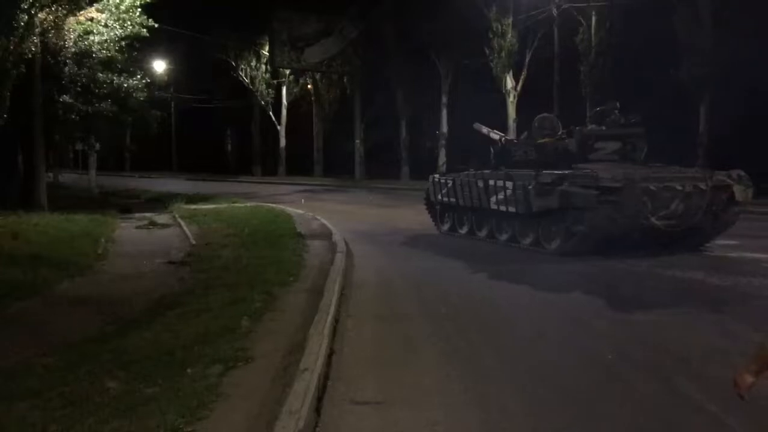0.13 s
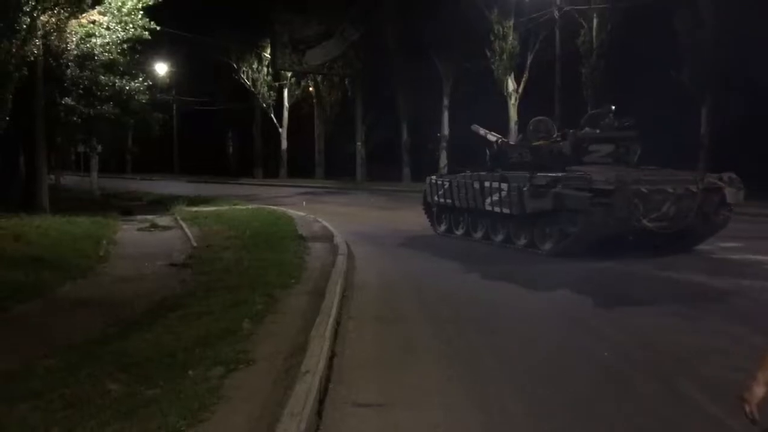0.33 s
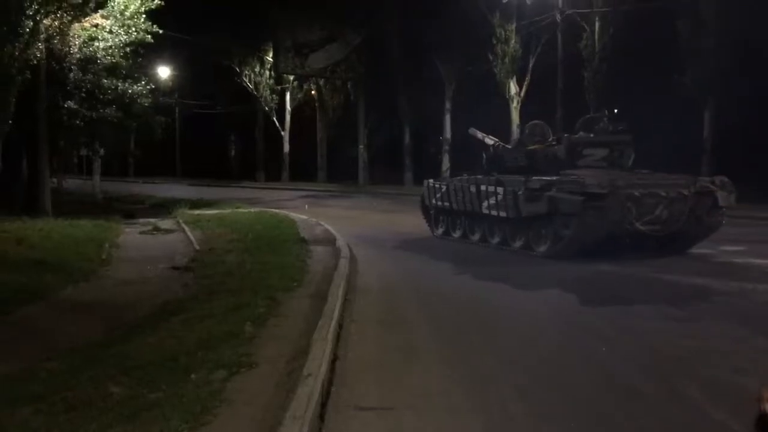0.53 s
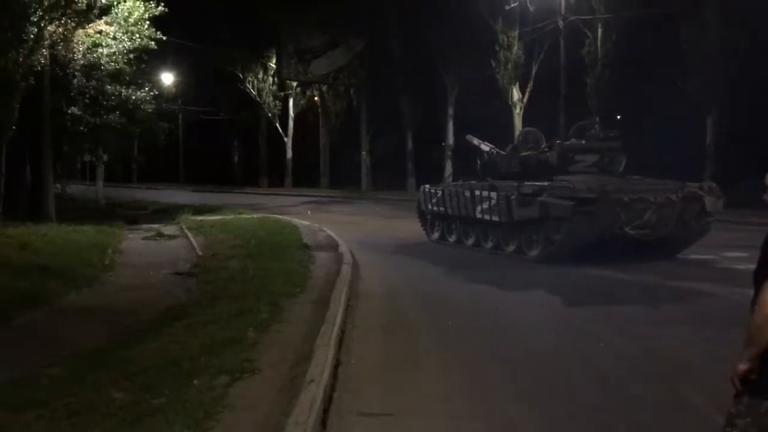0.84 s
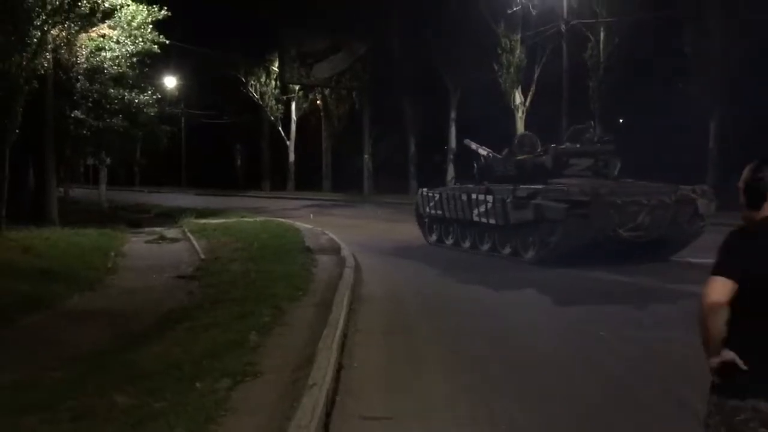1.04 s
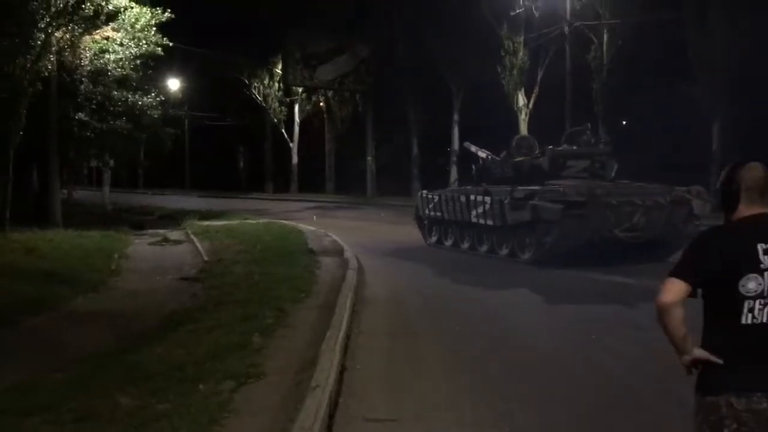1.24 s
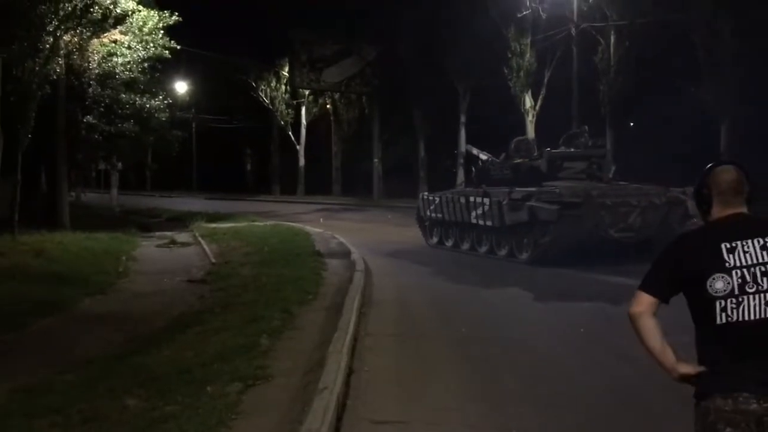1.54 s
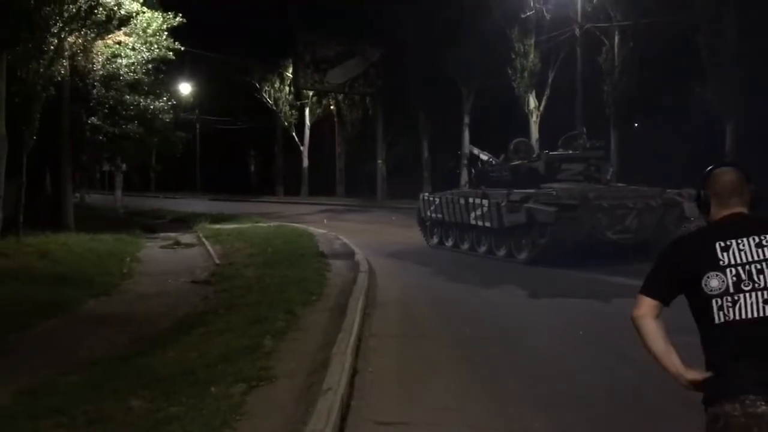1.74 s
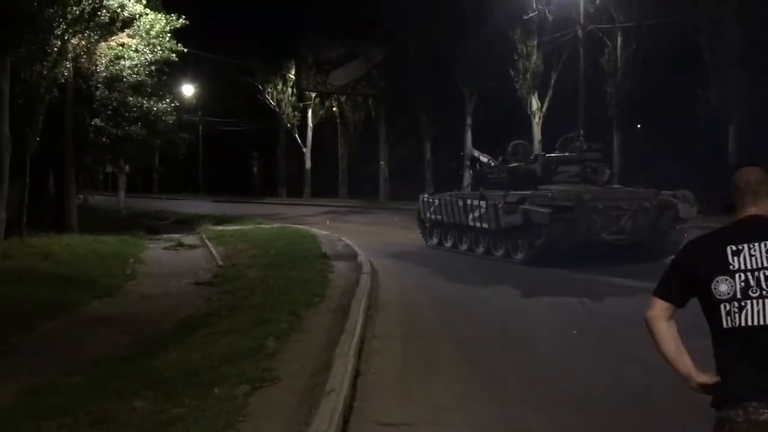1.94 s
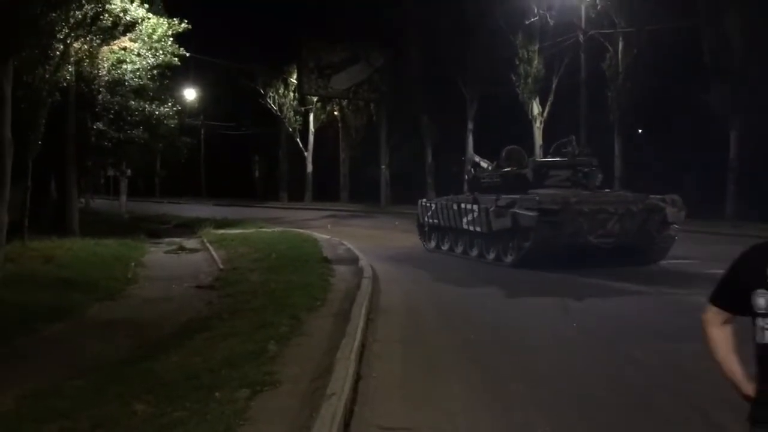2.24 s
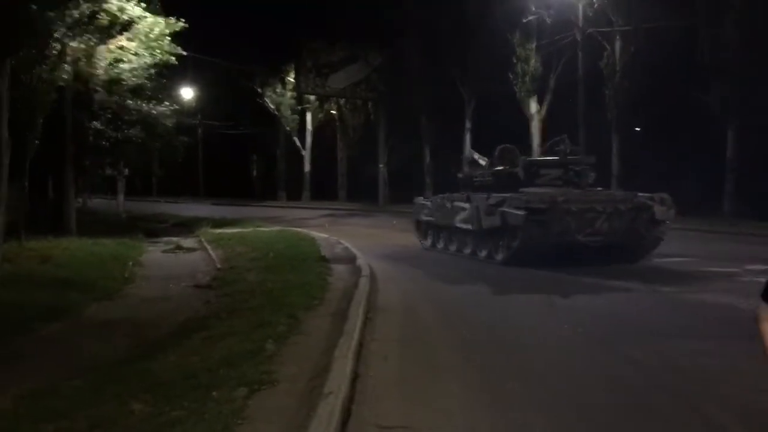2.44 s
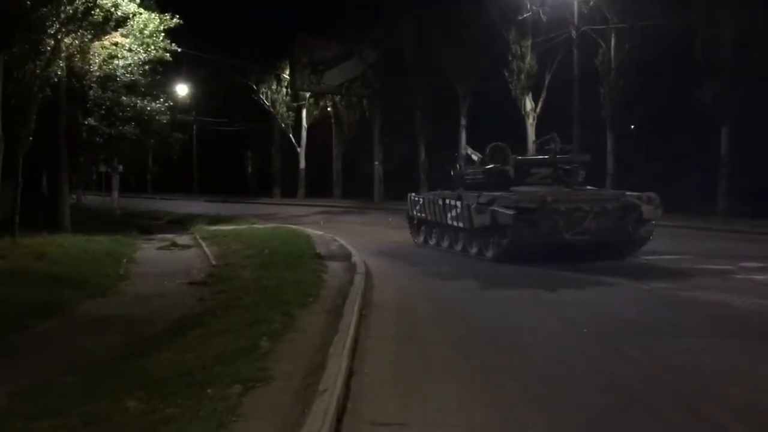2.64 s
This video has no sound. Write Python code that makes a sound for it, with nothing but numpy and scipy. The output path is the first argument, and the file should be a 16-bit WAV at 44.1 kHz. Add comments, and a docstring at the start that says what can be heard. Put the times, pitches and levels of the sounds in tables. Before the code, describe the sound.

After a tiny silence the sound cuts in abruptly: a deep, throbbing tank engine, steady but uneven, over quiet track rattle. Squeaks and ticks thicken in the second half; outdoors, fixed microphone at moderate distance, dull top end.

```python
"""The twelve-cylinder diesel of a heavy tracked vehicle creeping along a road drones unevenly.
The drone is a sum of harmonics of the engine cycle; exhaust and fan roar is shaped noise that throbs with it.
The steel track grinds as shaped noise and rattles as resonators struck by dense knocks.
Single links tick as bright noise bursts, link pins squeak and a brief groan falls as gliding rough tones.
The sound switches on abruptly after a short silence."""
import sys
import numpy as np
from scipy import signal
from scipy.fft import rfft, irfft
from scipy.io import wavfile
from scipy.ndimage import uniform_filter1d

SR = 44100
rng = np.random.default_rng(int(sys.argv[2]) if len(sys.argv) > 2 else 0)


def to_linear_factor(level_db):
    """Convert decibel levels (scalar or array-like) to linear amplitude factors."""
    exponent = np.asarray(level_db, float) / 20
    return 10 ** exponent


def bounce(signal):
    """Save signal as a 16-bit WAV file at the path given by the first command-line argument."""
    frames = np.transpose(np.atleast_2d(signal))
    limited = np.clip(frames, -1, 1)
    pcm = np.round(limited * 32767).astype(np.int16)
    wavfile.write(sys.argv[1], SR, pcm)


N = 123039  # samples
CYLINDERS = 12  # firings per engine cycle

# Course of the firing tone. Each row: time in seconds, firing rate in Hz, mean level in dB rms.
FIRING = [(0.1, 117.5, -34.5), (0.3, 116.3, -39.5), (0.5, 115.6, -36), (0.7, 115.7, -32.5),
          (0.9, 115.8, -30), (1.1, 116, -30.5), (1.3, 116.2, -32), (1.5, 117.3, -34), (1.65, 117, -34),
          (1.8, 114.8, -34), (1.95, 113, -28.5), (2.1, 109.5, -31), (2.25, 109.3, -36.5),
          (2.4, 111.8, -34.5), (2.55, 112.5, -32), (2.75, 115.8, -32.5)]


def level(x, db):
    """Amplitude normalisation: scales a signal to an rms level in dB."""
    return x * to_linear_factor(db) / np.sqrt(np.mean(x ** 2))


def curve(table, column=1):
    """Linear interpolation in time between the rows of a table."""
    rows = np.array(table, float)
    return np.interp(np.arange(N) / SR, rows[:, 0], rows[:, column])


def walk(rate_hz):
    """Slow random modulation: values held for 1 / rate and smoothed twice, with a spread near 1."""
    hold = int(SR / rate_hz)
    held = rng.standard_normal(400)[np.arange(N) // hold]
    smooth = uniform_filter1d(uniform_filter1d(held, hold), hold)
    return 1.3 * smooth  # makes up for the spread lost in smoothing


def flickering_noise(colour):
    """Spectral shaping of white noise, with independent level modulation of overlapping half-octave bands."""
    flicker_db, flicker_hz = 0.92, 12.04
    hz = np.maximum(np.arange(N // 2 + 1) * SR / N, 1)
    rows = np.array(colour, float)
    density_db = np.interp(np.log(hz), np.log(rows[:, 0]), rows[:, 1], -90, -90)
    shaped = rfft(rng.standard_normal(N)) * to_linear_factor(density_db)
    place = 2 * np.log2(hz / 10)  # half octaves above 10 Hz
    out = 0
    for band in range(22):
        weight = np.clip(1 - abs(place - band), 0, 1)
        out = out + irfft(shaped * weight, N) * to_linear_factor(flicker_db * walk(flicker_hz))
    return out


def knocks():
    """Random impact train: the envelope of dense uneven knocks with exponential tails, rms 1."""
    rate_per_s, spread_db, tail_s = 70, 3, 0.0089
    chance, strength = rng.random((N, 2)).T
    blows = (chance < rate_per_s / SR) * to_linear_factor(spread_db * (2 * strength - 1))
    fall = np.exp(-1 / (tail_s * SR))
    soft_blows = uniform_filter1d(blows, size=60)
    return level(signal.lfilter([1], [1, -fall], soft_blows), 0)


def bursts(events):
    """Transient modulation: a gain near 1 that peaks half a length after each event starts, then decays."""
    t, gain = np.arange(N) / SR, np.ones(N)
    for at, db, length in events:
        age = np.maximum(t - at, 0) / length * 2
        gain += (to_linear_factor(db) - 1) * np.e * age * np.exp(-age)
    return gain


def ring(modes, events):
    """Modal resonance: noise under knocks of each mode's own and under shared events drives damped resonators."""
    out, swell = 0, bursts(events)
    for hz, db, t60 in modes:
        r = np.exp(-np.log(1000) / (t60 * SR))
        turn = np.cos(2 * np.pi * hz / SR)
        poles = [1, -2 * r * turn, r * r]
        wide_poles = [1, -2 * r ** 4 * turn, r ** 8]  # decays four times as fast
        blows = (knocks() + swell - 1) * rng.standard_normal(N)
        # the second pass steepens the skirts of the resonance
        ringing = signal.lfilter([1], wide_poles, signal.lfilter([1, 0, -1], poles, blows))
        out = out + level(ringing, db)
    return level(out, 0)


def rough_tone(at, length, from_hz, to_hz, db, wobble_hz):
    """Frequency modulation: a tone glides and wobbles under a fluttering half-sine swell."""
    part = np.clip((np.arange(N) / SR - at) / length, 0, 1)
    hz = from_hz + (to_hz - from_hz) * part ** 2 + wobble_hz * walk(60)
    swell = to_linear_factor(db + 2.5 * walk(70)) * np.sin(np.pi * part)
    return swell * np.sqrt(2) * np.cos(2 * np.pi * np.cumsum(hz) / SR)


def groan():
    """Downward glide: a brief rough tone falls as it swells and fades."""
    # One row: start in seconds, length in seconds, first and last frequency in Hz,
    # mean rms level in dB at the height of the swell.
    fall = (2.505, 0.14, 600, 490, -38.5)
    return rough_tone(*fall, wobble_hz=22)


def ticks():
    """Impulsive radiation: single links snap as short bright noise bursts with a fast rise and decay."""
    # Snaps of single links. Each row: start in seconds, level in dB before the rise and decay factors.
    snaps = [(.173, -62), (.482, -64), (1.079, -63), (1.52, -65), (1.943, -56.5), (2.055, -62),
             (2.107, -61), (2.155, -63), (2.264, -61), (2.321, -61), (2.366, -62), (2.48, -62)]
    rise_s, decay_s = .003, 0.013
    t, shape = np.arange(N) / SR, np.zeros(N)
    for at, db in snaps:
        age = np.maximum(t - at, 0)
        shape += to_linear_factor(db) * (1 - np.exp(-age / rise_s)) * np.exp(-age / decay_s)
    band = signal.butter(2, [4000, 11000], "band", fs=SR, output="sos")  # Hz
    bright = signal.sosfilt(band, rng.standard_normal(N))
    return level(bright, 0) * shape


def squeaks():
    """Frictional slip: pins slip in their links and chirp as short, slightly gliding rough tones."""
    # Chirps of the link pins. Each row: start in seconds, frequency in Hz,
    # mean rms level in dB at the height of the swell.
    chirps = [(.505, 4120, -63), (.555, 3340, -59), (.85, 4100, -60), (1.777, 3418, -57),
              (1.82, 3420, -56.5), (1.86, 3380, -73), (1.9, 3920, -61), (2.04, 3978, -73),
              (2.098, 3420, -55), (2.138, 3333, -55), (2.2, 3864, -62), (2.252, 3430, -60.5),
              (2.292, 3920, -60), (2.34, 3950, -57.5), (2.358, 3438, -56.5), (2.425, 3876, -57),
              (2.468, 3360, -56), (2.55, 3910, -59.5), (2.58, 3450, -59)]
    length_s, wobble_hz = 0.027, 50.8
    glides = 1 + .008 * rng.standard_normal(len(chirps))  # last frequency over first
    out = 0
    for (at, hz, db), glide in zip(chirps, glides):
        out = out + rough_tone(at, length_s, hz, hz * glide, db, wobble_hz)
    return out


def tracks():
    """Friction and impact: links grind as steady noise, and dense knocks roughen it and ring the steel."""
    # Grinding of links on wheels and road. Each row: frequency in Hz, relative density in dB per Hz.
    grind_colour = [(1410, -24.5), (2400, -3.5), (2760, -7), (3410, -6.5), (4020, -7), (4910, -16),
                    (5460, -16), (8510, -23), (11700, -31), (15200, -63.5), (22000, -120)]
    # Modes of the track links. Each row: frequency in Hz, relative level in dB, 60 dB decay in seconds.
    steel_modes = [(2363, 3, 0.043), (3376, 0, 0.027), (3860, -5.5, 0.02), (4106, -3.5, 0.053),
                   (5430, -11, 0.015), (6140, -11.5, 0.06)]
    # Scrapes that change how the links sing. Each row: start in seconds, peak in dB over the steady
    # knocking (a negative one lessens it), length in seconds.
    scrapes = [(.56, 11, .03), (1.78, 3, 0.043), (1.94, -6, 0.022), (2.096, 1, .05), (2.293, 2, 0.069),
               (2.472, 7, 0.026)]
    # Course of the rattle. Each row: time in seconds, level of the grinding in dB rms.
    rattle_course = [(.1, -57.5), (.19, -55), (.3, -57.5), (.55, -55.5), (.75, -57.5), (1.1, -58),
                     (1.4, -60), (1.65, -58), (1.85, -55.5), (2.12, -55), (2.35, -55), (2.55, -56),
                     (2.78, -57)]
    knock_depth, ring_db = 0.17, -6.5  # ring level is relative to the grinding
    grind = level(flickering_noise(grind_colour) * (1 + knock_depth * knocks()), 0)
    return (grind + to_linear_factor(ring_db) * ring(steel_modes, scrapes)) * to_linear_factor(curve(rattle_course))


def roar(cycle):
    """Amplitude-modulated turbulence: gas and fan noise throbs with the cycle, over hull resonance and rumble."""
    # Exhaust and fan noise. Each row: frequency in Hz, relative density in dB per Hz.
    gas_colour = [(110, -30.5), (180, -3), (225, -9.5), (446, -13), (605, -11.5), (793, -13), (1180, -14),
                  (1750, -19), (2370, -28), (2640, -39), (3000, -40.5), (3900, -54), (6600, -120)]
    # Body rumble between the tones. Each row: frequency in Hz, relative density in dB per Hz.
    rumble_colour = [(8, -18.5), (28, -18), (40, -14), (55, -4), (76, -6), (100, -0.5), (170, -7),
                     (230, -10.5), (300, -28.5)]
    # Course of the roar. Each row: time in seconds, level of the gas and fan noise in dB rms.
    roar_course = [(0.1, -35.5), (0.14, -35.5), (0.19, -34), (0.25, -36.5), (1.67, -38.5), (1.79, -37),
                   (2.19, -37), (2.37, -36.5), (2.43, -36.5), (2.61, -37.5), (2.78, -41.5)]
    # Modes of the hull. Each row: frequency in Hz, relative level in dB, 60 dB decay in seconds.
    hull_modes = [(254, -4.5, 0.079), (428.7, -5, 0.098), (513, -2, 0.15), (594, 0.5, 0.082),
                  (680.4, -2.5, 0.16), (882, -1, 0.067), (1157, -3, 0.034), (1783, -8.5, 0.029)]
    # Course of the hull ringing. Each row: time in seconds, level in dB over the gas and fan noise.
    hull_course = [(.1, -8), (1.4, -8.5), (2.1, -8), (2.78, -4.5)]
    # Heavier jolts that shake the hull and make the roar flare. Each row: start in seconds,
    # peak in dB over the steady knocking, length in seconds.
    jolts = [(0.158, 2, 0.026), (0.27, 3.5, 0.019), (0.675, 4, 0.051), (0.89, 2.5, 0.018),
             (1.092, 2.5, 0.019), (1.798, 3.5, 0.018), (1.912, 2, 0.021), (2.254, 1, 0.016),
             (2.355, 0.5, 0.027), (2.526, 3.5, 0.046), (2.631, 7.5, 0.011), (2.693, 7, 0.07)]
    puff_depth, puff_turns, jolt_flare = 0.099, .9, 0.43  # gas puffs hardest at puff_turns of the cycle
    puff = cycle - 2 * np.pi * puff_turns
    throb = 1 + puff_depth * (np.cos(puff) / 2 + np.cos(2 * puff))
    flare = bursts(jolts) ** jolt_flare
    gas = level(flickering_noise(gas_colour) * throb * flare, 0)
    hull = to_linear_factor(curve(hull_course)) * ring(hull_modes, jolts)
    rumble = level(flickering_noise(rumble_colour), -43)
    return (gas + hull) * to_linear_factor(curve(roar_course)) + rumble


def drone(cycle):
    """Fourier synthesis: a firing tone and wavering cycle harmonics, phased by the unequal cylinders."""
    # Tones of the uneven cycle besides the firing tone.
    # Each row: multiple of the cycle rate, mean level in dB rms.
    cycle_tones = [(4, -56.5), (5, -54), (6, -41), (7, -53.5), (8, -73.5), (9, -41), (10, -56.5), (11, -55),
                   (13, -52.5), (14, -67), (15, -37.5), (16, -59), (17, -41), (18, -50), (19, -49.5),
                   (20, -54.5), (21, -51.5), (22, -68), (24, -56), (27, -53.5)]
    # Strength of each firing in the cycle, which sets the phases only. One column: strength in dB.
    firing_strengths = [0, .4, 3.7, -5.6, .4, .7, 2.4, -2.5, -3, .7, 0, -.8]
    waver_db, waver_hz = 1.38, 4.39
    slip_rad, smear_rad = .14, .123
    firing_gain = to_linear_factor(curve(FIRING, column=2) + 0.67 * walk(12.6))
    out = firing_gain * np.cos(CYLINDERS * cycle + slip_rad * walk(8.3))
    uneven = np.angle(np.fft.fft(to_linear_factor(np.array(firing_strengths))))
    for k, db in cycle_tones:
        k = round(k)
        smear = smear_rad * (k - CYLINDERS) ** 2  # dispersion in the pipe smears each thump
        phase = uneven[k % CYLINDERS] - smear + slip_rad * walk(2.99)
        out = out + to_linear_factor(db + waver_db * walk(waver_hz)) * np.cos(k * cycle + phase)
    return -np.sqrt(2) * out


def scene():
    """Superposition: all sources add at the microphone, drone and roar sharing one engine-cycle phase."""
    start_turns = .174  # where the cycle stands at the start
    cycle = 2 * np.pi * (np.cumsum(curve(FIRING)) / CYLINDERS / SR + start_turns)
    return (groan() + ticks() + squeaks() + tracks() + roar(cycle) + drone(cycle))[None]


def top_cut(x):
    """Nothing passes above the cut-off."""
    return signal.sosfilt(signal.butter(12, 11840, fs=SR, output="sos"), x)


def record(dry):
    """Gating and band limitation: the sound switches on abruptly and a steep low-pass removes its top."""
    on_s, fade_s, top_hz = 0.083, 0.0021, 11750
    on = np.clip((np.arange(N) / SR - on_s) / fade_s, 0, 1)
    low_pass = signal.ellip(8, .2, 60, top_hz, fs=SR, output="sos")
    dull = signal.sosfilt(low_pass, dry * on)
    return top_cut(dull)


dry = scene()
out = record(dry)
bounce(out)
```